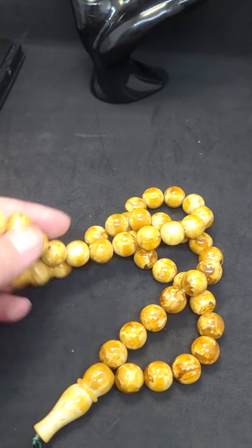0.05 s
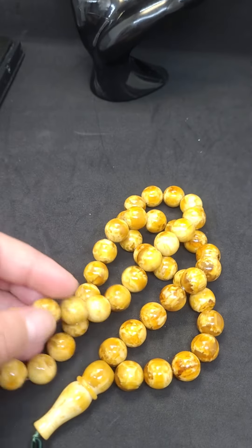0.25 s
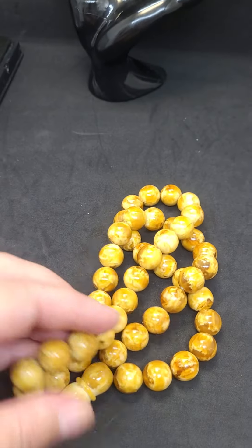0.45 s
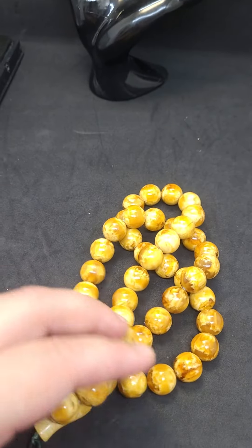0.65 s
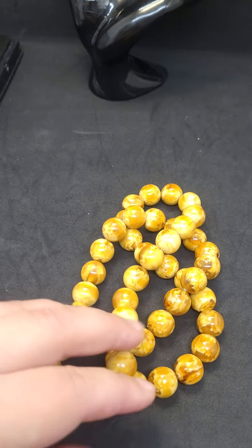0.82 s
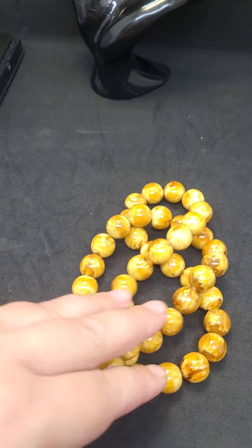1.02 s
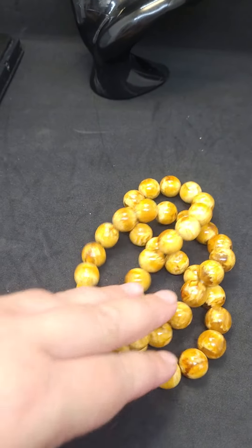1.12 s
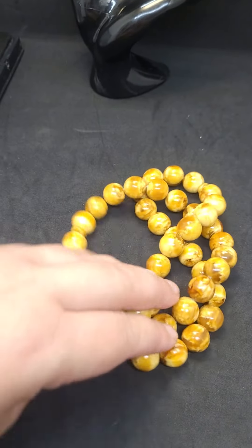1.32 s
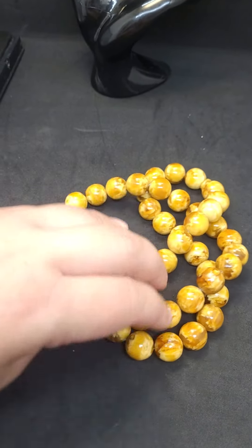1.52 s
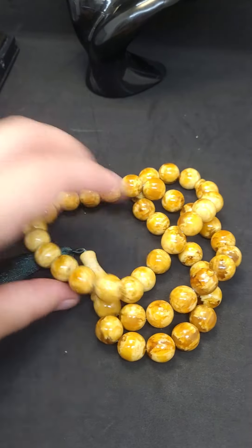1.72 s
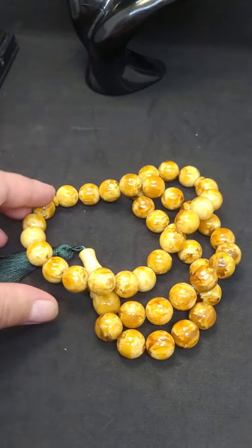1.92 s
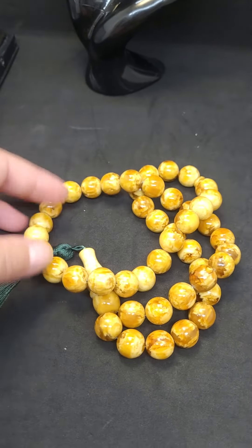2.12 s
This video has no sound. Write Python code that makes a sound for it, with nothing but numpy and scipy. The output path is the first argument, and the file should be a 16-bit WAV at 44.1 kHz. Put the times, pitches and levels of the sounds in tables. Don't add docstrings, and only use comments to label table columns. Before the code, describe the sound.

A strand of beads is handled on a cloth-covered board: bright dry ticks over soft woody thuds, sparse clicks in the middle, a scraping slide after one second, then faint rustles. Close, quiet and indoors.

```python
import sys
import numpy as np
from scipy import signal
from scipy.fft import rfft, irfft
from scipy.io import wavfile
from scipy.ndimage import uniform_filter1d

SR = 44100
rng = np.random.default_rng(int(sys.argv[2]) if len(sys.argv) > 2 else 0)


def field_ratio(decibels):
    return 10 ** (np.asarray(decibels, dtype=float) / 20)


def bounce(signal):
    frames = np.transpose(np.atleast_2d(signal))
    limited = np.clip(frames, -1, 1)
    pcm = np.round(limited * 32767).astype(np.int16)
    wavfile.write(sys.argv[1], SR, pcm)


N = 94815
LEAD_S = 0.000283

# frequency in Hz, level in dB, t60 in seconds.
BOARD_MODES = [(63, -7, 0.23), (110.2, -2.5, 0.22), (162.7, 0, 0.15), (237.2, -5, 0.087), (270, -4.5, 0.16),
               (344, -7.5, 0.038), (390.3, 3.5, 0.042), (487, -2.5, 0.12), (654.6, 3, 0.086),
               (700, -12.5, 0.079), (800.5, -3, 0.11), (873.5, -4, 0.14), (1203, 1, 0.04),
               (1517, -10, 0.049)]
# frequency in Hz, left minus right in dB.
BOARD_SIDE = [(60, 4.5), (200, 6), (400, -3), (1500, 0)]
# frequency in Hz, lead of the left port in radians.
BOARD_PHASE = [(150, 0.19), (300, 0.57), (640, 1.82), (1300, 1.3)]


def curve(table, hz):
    table = np.array(table, float)
    return np.interp(np.log(np.maximum(hz, 1)), np.log(table[:, 0]), table[:, 1])


def unit(x):
    return x / np.sqrt(np.mean(x ** 2))


def colour(x, table):
    n = x.shape[-1]
    hz = np.arange(n // 2 + 1) * SR / n
    return irfft(rfft(x) * field_ratio(curve(table, hz)), n)


def ring(x, hz, width_hz):
    return signal.lfilter(*signal.iirpeak(hz, hz / width_hz, fs=SR), x)


def highpass(x, hz):
    return signal.lfilter(*signal.butter(2, hz, "high", fs=SR), x)


def walk(rate_hz):
    k = int(SR / rate_hz)
    held = np.repeat(rng.standard_normal(N // k + 1), k)
    return 1.17 * uniform_filter1d(uniform_filter1d(held, k), k)[:N]


def add(out, sound, start_s):
    i = int(start_s * SR)
    out[:, i:i + sound.shape[1]] += sound[:, :N - i]


def pan(lr_db):
    return field_ratio(np.array([lr_db, -lr_db]) / 2)


def both_ports(x):
    return np.array([x, np.roll(x, int(LEAD_S * SR))])


def room_floor():
    # frequency in Hz, density in dB per Hz.
    room = [(18, -32), (30, 3), (192, 7), (2020, -17), (2550, -14), (2760, -17), (4780, -30), (6540, -12),
            (15500, -30)]
    return field_ratio(-76.5) * unit(colour(rng.standard_normal((2, N)), room))


def grit():
    return np.exp(0.18 * unit(uniform_filter1d(rng.standard_normal(N), size=30)))


def cloth_hiss(speed_db, skin):
    # frequency in Hz, density in dB per Hz.
    hiss_spectrum = [(880, 2.5), (1500, 3), (2180, -6.5), (3100, -5.5), (4410, 5), (5740, -1),
                     (8410, -10.5), (15600, -1.5)]
    alike, flicker_db = 0.14, 1.5
    mid, side = rng.standard_normal((2, N))
    left, delayed = both_ports(mid)
    air = np.array([left, alike * delayed + np.sqrt(1 - alike ** 2) * side])
    air = unit(colour(air, hiss_spectrum)) * pan(2.5)[:, None]
    rubbed = air + highpass(air, 9500) * skin
    return grit() * rubbed * field_ratio(speed_db + flicker_db * walk(31.04))


def board_rumble(weight_db):
    tilt_db_oct, rough_db, patchy_db = -3, 6.5, 2.4
    rub = 0
    rough = field_ratio(rough_db * walk(39.1))
    for hz, db, t60_s in BOARD_MODES:
        force = rng.standard_normal(N) * rough * field_ratio(patchy_db * walk(14.9))
        push = unit(ring(force, hz, 2.4 / t60_s))
        gains = field_ratio(db + tilt_db_oct * np.log2(hz / 200)) * pan(curve(BOARD_SIDE, hz))
        rub = rub + gains[:, None] * both_ports(push)
    return unit(rub) * field_ratio(weight_db)


def slide():
    # time in seconds, speed as hiss in dB, weight in dB, share of bright skin rub.
    strokes = [(0, -58.5, -66.5, 2.5), (.13, -67, -61.5, 1.4), (.17, -73.5, -68.5, 0.15),
               (.35, -70.5, -55, 0.48), (0.719, -74, -62.5, 0.31), (.82, -81, -70.5, 0.9),
               (1.047, -62.5, -55, 0.21), (1.087, -54.5, -60.5, 0.33), (1.3, -46.5, -44.5, 0.81),
               (1.36, -53.5, -45, 0.84), (1.419, -48.5, -48.5, 1.45), (1.492, -57, -53, 0.5),
               (1.624, -77, -75, 0.62), (1.774, -75, -65.5, 1.6), (1.831, -60, -50.5, 0.13),
               (1.98, -72, -68.5, 0.39), (2.071, -61, -64, 1.6), (2.113, -79, -68, 1.1)]
    s, speed_db, weight_db, skin = np.array(strokes).T
    t = np.arange(N) / SR
    hiss = cloth_hiss(np.interp(t, s, speed_db), np.interp(t, s, skin))
    return hiss + board_rumble(np.interp(t, s, weight_db))


def drag():
    # start, rise, hold and fall in seconds, level in dB.
    final_drag = (1.97, .03, .085, .06, -57)
    # frequency in Hz, width in Hz, level in dB.
    sung_modes = [(238.4, 41, 1), (494, 104, -11), (726, 53, -10), (1740, 28, -35)]
    *stages_s, level_db = final_drag
    env_db = np.interp(np.arange(N) / SR, np.cumsum(stages_s), [-5, 5.5, -1.0, -9.0], left=-90)
    x = 0
    for hz, width_hz, db in sung_modes:
        narrow = ring(rng.standard_normal(N), hz, width_hz)
        x = x + field_ratio(db) * unit(ring(narrow, hz, 2 * width_hz))
    return both_ports(x * field_ratio(level_db + env_db))


def scuffs():
    # start in seconds, length in seconds, level in dB.
    brushes = [
        (0.103, 0.04, -59),
        (1.064, 0.055, -65),
        (1.385, 0.078, -54),
        (1.822, 0.029, -78),
        (1.962, 0.026, -65),
        (2.001, 0.089, -64),
    ]
    edge_s = 0.0081
    t = np.arange(N) / SR
    env = 0
    for s, length_s, db in brushes:
        inside_s = np.minimum(t - s, (s + length_s - t) / 3)
        env = env + field_ratio(db) * np.clip(inside_s / edge_s, 0, 1)
    skin = unit(highpass(rng.standard_normal((2, N)), 3640))
    return skin * env * grit() * pan(4.3)[:, None]


def bumps(table, way):
    out, t = np.zeros((2, N)), np.arange(-512, 512) / SR
    for middle_s, db, hz, cycles in table:
        swell = np.cos(np.pi * np.clip(t * hz / cycles, -.5, .5)) ** 2
        lead = curve(BOARD_PHASE, hz) * np.array([[.5], [-.5]])
        gains = field_ratio(db) * pan(curve(BOARD_SIDE, hz))[:, None]
        add(out, way * gains * swell * np.cos(2 * np.pi * hz * t + lead), middle_s - 512 / SR)
    return out


def lifts():
    # middle in seconds, peak in dB, pitch in Hz, length in cycles.
    releases = [
        (.2654, -30.5, 263, 1.1),
        (1.3012, -23.5, 736, 5.7),
        (1.3093, -29, 170, 1.6),
        (.2362, -30.5, 228, 1.6),
        (.2768, -31.5, 330, 1.4),
        (1.8575, -28, 130, 3.35),
        (1.9415, -44, 110, 2.5),
    ]
    return bumps(releases, -0.85)


def soft_landings():
    # middle in seconds, peak in dB, pitch in Hz, length in cycles.
    landings = [(0.2347, -24.5, 249, 1.8), (0.2452, -27, 328, 1.7), (0.2584, -24.5, 226, 2.2),
                (0.2641, -17.5, 315, 1.55), (.2758, -22.5, 377, 3.7), (0.3033, -20.5, 337, 2.7),
                (0.6272, -39.5, 309, 4.3), (.635, -37.5, 174, 1.7), (0.641, -36, 176, 1.9),
                (1.3035, -27.5, 276, 2.1), (1.408, -35.5, 203, 2.4), (1.4352, -30.5, 224, 2.4),
                (1.8795, -31.5, 125, 2.9), (1.897, -40.5, 127, 3), (1.911, -45, 143, 3)]
    return bumps(landings, 0.88)


def blows(table, rise_s, spread_oct, gain_db):
    out, t = np.zeros((2, N)), np.arange(SR // 4) / SR
    hz, db, t60_s = (c[:, None] for c in np.array(BOARD_MODES).T)
    early = 1 + 2.5 * np.exp(-t * hz / 4.5)
    attack = early * (1 - np.exp(-t / rise_s))
    port_phase = np.array([1 + 0 * hz, np.exp(-1j * curve(BOARD_PHASE, hz))])
    for s, level_db, centre_oct, damp in table:
        z = rng.standard_normal((3, len(BOARD_MODES), 1))
        scatter_db = np.clip(2.2 * z[0], -4, 3)
        off_centre = (np.log2(hz / 300) - centre_oct) / spread_oct
        g = field_ratio(db + scatter_db - 8.1 * off_centre ** 2)
        decay = field_ratio(-60 * 1.063 * damp * t / t60_s)
        detuned_hz = hz * (1 + 0.01 * z[1])
        wave = g * attack * decay * np.exp(2j * np.pi * detuned_hz * t)
        sides = pan(curve(BOARD_SIDE, hz) + np.clip(z[2], -2, 2)) * port_phase
        sound = -(sides[..., 0] @ wave).imag / np.sqrt((g ** 2).sum())
        add(out, sound * field_ratio(level_db + gain_db), s)
    return out


def thuds():
    # start in seconds, level in dB, centre in octaves above 300 Hz, damping by the hand.
    presses = [(.005, -50, -1.0, 1.1), (.04, -49, -0.7, 0.75), (.076, -46.5, -0.65, 0.73),
               (.24, -32, 2.16, 1.5), (.262, -32.5, -0.5, 0.45), (.3, -35, -.8, 1.33),
               (.31, -41.5, -2, 0.91), (.36, -47, 0.8, 1.3), (.44, -54, -1.6, 1.1), (.505, -47, 1.8, 1.2),
               (.622, -40, 4.5, 6.3), (1.168, -50.5, -0.8, 0.86), (1.306, -29.5, 0.1, 2.1),
               (1.31, -40, -1, 1.1), (1.33, -40, -1.2, 1.7), (1.412, -42.5, -0.5, 0.61),
               (1.5, -42, -0.4, 1.2), (1.535, -39.5, 0.06, 1.26), (1.555, -44.5, -0.93, 1.27),
               (1.662, -46.5, -0.27, 1.2), (1.685, -53, 0.03, 1.2), (1.789, -45, 0.1, 1.3),
               (1.822, -37, -0.5, 1.35), (1.853, -42.5, -0.57, 0.82), (1.885, -45, 0.05, 1.13),
               (1.935, -45.5, -1.0, 1.2), (1.95, -46.5, -2, 1.04), (1.99, -44.5, -0.86, 1.2),
               (.335, -44, -2, 0.85), (.65, -49.5, -0.63, 0.72), (.47, -48.5, -0.4, 0.89),
               (1.385, -45, -0.5, 1.3)]
    return blows(presses, rise_s=0.006, spread_oct=0.33, gain_db=-4.5)


def knocks():
    # start in seconds, level in dB, centre in octaves above 300 Hz, damping by beads lying near.
    drops = [(.109, -47.5, 1.1, 0.82), (.127, -54, 2, 0.98), (.180, -54, 0.94, 1.1),
             (.2325, -27, 0.88, 0.86), (.240, -31, 1, 1), (.257, -29.5, 0.24, 0.44),
             (.2655, -24.5, 1.6, 1.04), (.275, -27, 1.05, 0.56), (.3025, -20, 0.84, 0.88),
             (.306, -22.5, 1.37, 1.4), (.434, -49, 1.2, 1.4), (.452, -35.5, 1.12, 1.27),
             (.586, -41.5, 0.075, 0.74), (.620, -29, 1.52, 1.08), (.746, -48.5, 1.46, 0.45),
             (.837, -53, 1.2, 0.45), (.900, -42.5, 0.72, 0.93), (.944, -31, 1.35, 1.2),
             (1.148, -48, 1.36, 0.75), (1.166, -41.5, 0.75, 1.3), (1.277, -27.5, 1.65, 2.2),
             (1.297, -29.5, 1.08, 0.53), (1.3005, -21, 1.17, 1.5), (1.447, -37.5, 0.94, 1.3),
             (1.529, -40, 0.6, 1), (1.664, -59.5, 0.56, 1.8), (1.819, -41, 1.5, 1.5),
             (1.840, -35.5, 1.67, 2.8)]
    return blows(drops, rise_s=0.0013, spread_oct=0.74, gain_db=-8)


def minimum_phase(shape):
    cep = irfft(np.log(shape + 1e-4))
    cep[1:2048] *= 2
    cep[2049:] = 0
    return np.exp(rfft(cep))


def clicks():
    # time in seconds, peak in dB, left minus right in dB, brightness in octaves above 7 kHz.
    contacts = [(0.1087, -35.5, -1, 0.23), (0.1267, -41, 5.5, -0.034), (0.2366, -32.5, 7, 0.71),
                (0.251, -35, -2, -0.88), (0.262, -26, 5.5, 0.3), (0.3026, -26, 7, 0.31),
                (0.313, -51, 4, -0.47), (0.4334, -33, 0.5, -0.078), (0.4525, -33, 4.5, -0.097),
                (0.4667, -43, 2, -0.16), (0.586, -31, 0, 0.15), (0.62, -21.5, 4.5, 0.36),
                (0.747, -40.5, 4, 0.48), (0.9439, -37.5, 2.5, 0.22), (1.1482, -27, 0, -0.63),
                (1.1665, -38, 4, -0.37), (1.276, -31, 9, 0.12), (1.2991, -26, 15.5, 0.14),
                (1.296, -22.5, -2, 0.036), (1.446, -24, 5.5, -0.22), (1.521, -40, 3, -0.8),
                (1.8438, -45, 0, -0.86), (1.965, -52.5, 7, -0.42), (0.18, -58, 9, -0.85),
                (0.2956, -39, 20, -1.6), (.898, -77, -4, .1), (1.0692, -46.5, 1, -0.44),
                (1.8153, -58, 5, 0.029), (2.001, -56, -5, 0.039)]
    # frequency in Hz, density in dB per Hz.
    tick_spectrum = [(880, -9.5), (1500, -6), (2180, -14.5), (4240, -4), (8500, -7), (9280, -10),
                     (15600, -18)]
    tick_s, tail_db, hold_s, sparkle = 0.0001, -15, 0.0085, 0.39
    bright_t60_s, treble_sag_db_s, sag_db_s = 0.012, 459, 378
    dull_t60_s, dull_db, dull_hz = 0.1, -2, 6500
    out, t = np.zeros((2, N)), np.arange(4096) / SR
    hz = np.arange(2049) * SR / 4096
    late_s = t - np.array([[0], [LEAD_S]])

    def fade(t60_s):
        return field_ratio(-60 * np.maximum(late_s - hold_s, 0) / t60_s - sag_db_s * late_s)

    bright_fade = fade(bright_t60_s) * field_ratio(-treble_sag_db_s * late_s)
    dull_fade = field_ratio(dull_db) * fade(dull_t60_s)
    for s, db, lr_db, bright_oct in contacts:
        noise = rng.standard_normal((6, 4096))
        grain = np.exp(sparkle * np.clip(uniform_filter1d(noise[4:], size=24) * 5, -2, 1.2))
        dull = signal.lfilter(*signal.butter(2, dull_hz, fs=SR), noise[2:4])
        tail = field_ratio(tail_db) * grain * (noise[:2] * bright_fade + dull * dull_fade)
        tone = np.cos(2 * np.pi * 7000 * 2 ** bright_oct * late_s)
        tick = -np.exp(-np.maximum(late_s, 0) / tick_s) * tone
        tilt_db = 6.7 * bright_oct * np.log2(np.maximum(hz, 2000) / 7000)
        shape = field_ratio(curve(tick_spectrum, hz) + tilt_db)
        x = irfft(rfft((tick + tail) * (late_s >= 0)) * minimum_phase(shape))
        add(out, x / np.abs(x).max() * field_ratio(db) * pan(lr_db)[:, None], s + 0.00054)
    return out


def scene():
    friction = slide() + drag() + scuffs()
    board = lifts() + soft_landings() + thuds() + knocks()
    return room_floor() + friction + board + clicks()


def band_limit(x):
    return signal.sosfilt(signal.butter(12, 16500, fs=SR, output="sos"), x)


def record(dry):
    # frequency in Hz, width in Hz, boost as a gain.
    ports = [
        (9270, 780, 1.05),
        (6900, 1100, 0.99),
    ]
    mic = np.array([x + boost * ring(x, hz, width_hz) for x, (hz, width_hz, boost) in zip(dry, ports)])
    top_cut = signal.ellip(8, .3, 42, 15750, fs=SR, output="sos")
    mix = signal.sosfilt(top_cut, highpass(mic, 28))
    return band_limit(mix)


dry = scene()
out = record(dry)
bounce(out)
```